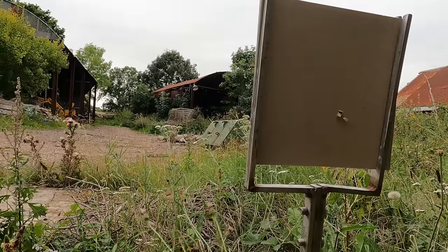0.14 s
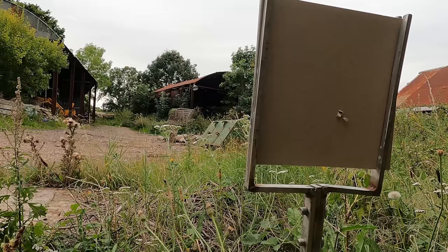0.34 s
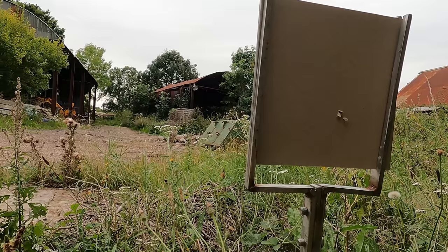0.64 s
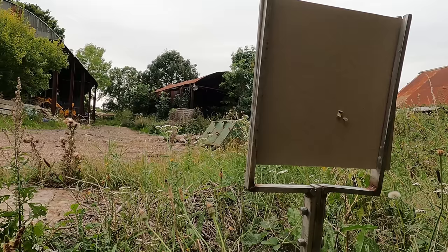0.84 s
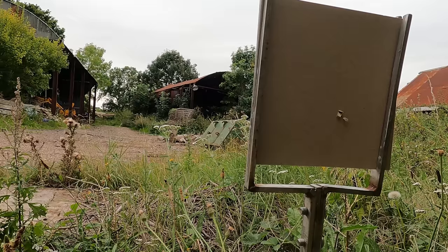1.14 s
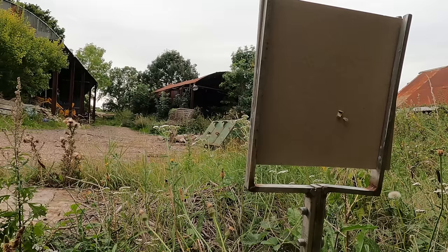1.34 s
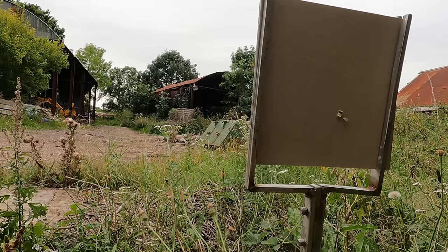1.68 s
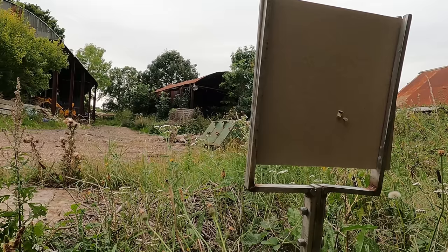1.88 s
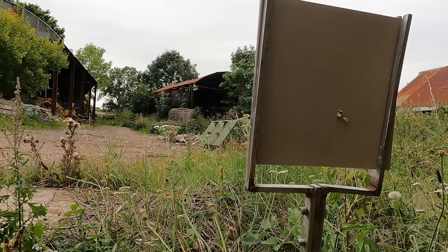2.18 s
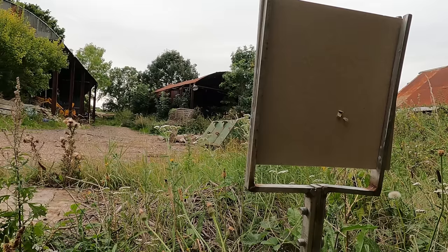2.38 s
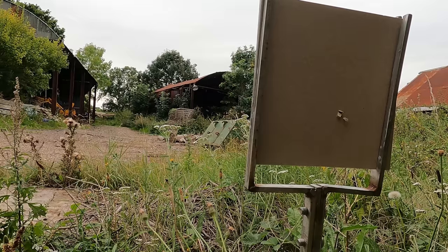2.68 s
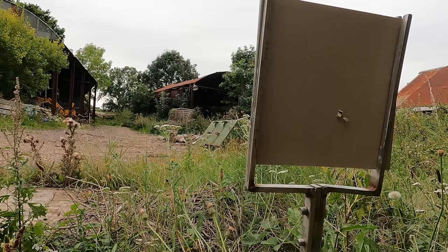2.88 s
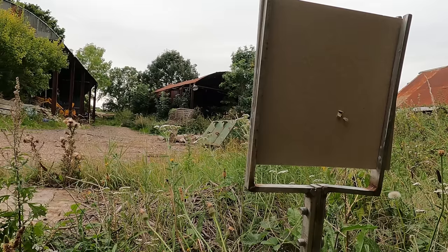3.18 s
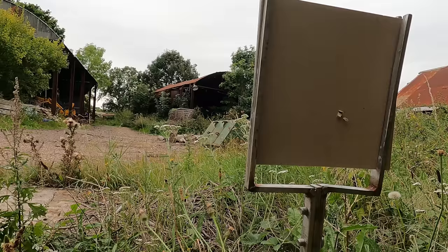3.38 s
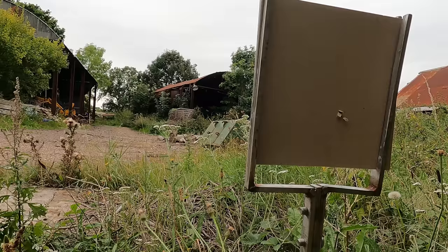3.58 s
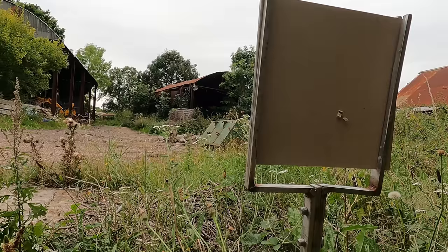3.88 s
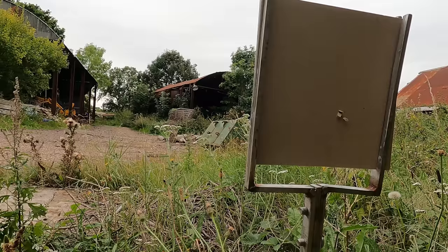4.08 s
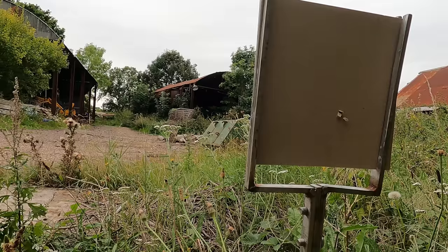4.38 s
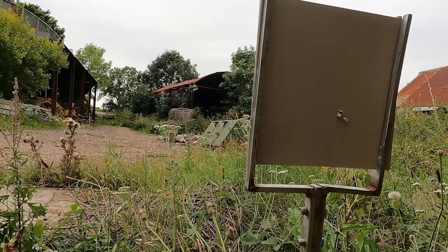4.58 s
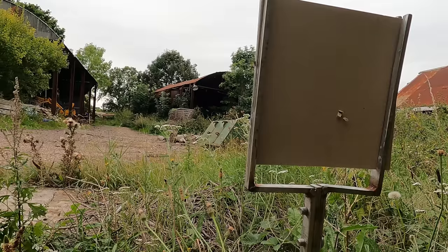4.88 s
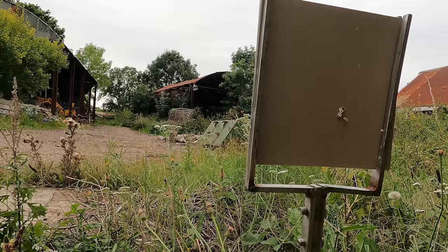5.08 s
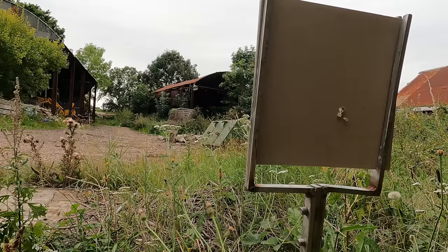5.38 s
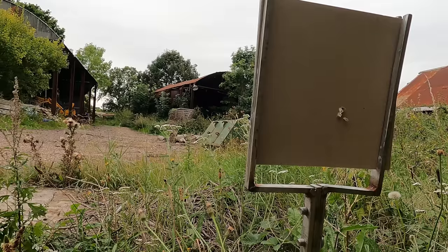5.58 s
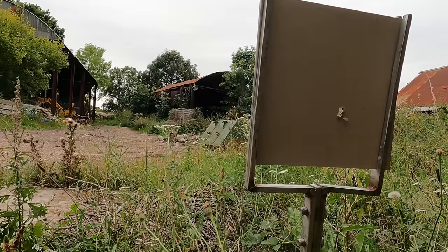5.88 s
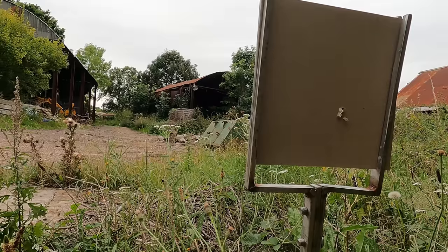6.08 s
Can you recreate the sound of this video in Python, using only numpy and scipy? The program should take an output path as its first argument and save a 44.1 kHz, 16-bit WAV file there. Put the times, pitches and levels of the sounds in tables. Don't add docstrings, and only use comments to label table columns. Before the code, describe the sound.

A vehicle drones past on the left of an open farm, then an air rifle pellet cracks sharply through a card target beside the microphone.

```python
import sys
import numpy as np
from scipy import signal
from scipy.io import wavfile
from scipy.ndimage import uniform_filter1d

SR = 44100
rng = np.random.default_rng(int(sys.argv[2]) if len(sys.argv) > 2 else 0)


def ratio_of_db(decibels):
    return 10 ** (np.asarray(decibels, float) / 20)


def generate_wav(signal):
    frames = np.transpose(np.atleast_2d(signal))
    scaled = np.clip(frames, -1, 1) * 32767
    pcm = np.round(scaled).astype(np.int16)
    wavfile.write(sys.argv[1], SR, pcm)


N = 275184
IMPACT_S = 5.04833


def evened(x):
    return x / np.sqrt(np.mean(x ** 2) + 1e-20)


def read(points, hz):
    f, value = np.transpose(points)
    return np.interp(np.log(hz + 1), np.log(f + 1), value)


def curves(rows, t):
    s, *columns = np.transpose(rows)
    return [np.interp(t, s, c) for c in columns]


def sides(lean_db):
    return ratio_of_db(np.multiply.outer([.5, -.5], lean_db))


def add(mix, s, sound):
    part = mix[:, round(s * SR):][:, :sound.shape[1]]
    part += sound[:, :part.shape[1]]


def burst(hz, db, length_ms):
    t = np.arange(round(length_ms * SR / 1000) + 8) / SR
    return ratio_of_db(db - 60 * (1000 * t / length_ms) ** 2) * np.sin(2 * np.pi * hz * t)


def ring(hz, db, t60):
    t = np.arange(round(1.5 * t60 * SR)) / SR
    soft_start = 1 - np.exp(-t / .0008)
    return ratio_of_db(db - 60 * t / t60) * np.sin(2 * np.pi * hz * t) * soft_start


def blur(hz, width):
    r = np.exp(-np.pi * width / SR)
    slow = rng.standard_normal(len(hz)) + 1j * rng.standard_normal(len(hz))
    for _ in range(2):
        slow = signal.lfilter([1 - r], [1, -r], slow)
    return evened((slow * np.exp(2j * np.pi * np.cumsum(hz) / SR)).real)


def noise(shape, level_db, lean_db, patchy_db, size, tilt_db=0, alike=None):
    # pitch_hz, likeness [0 to 1]
    usual_alike = [(60, 1.0), (150, 1), (380, 0.97367), (950, 0.75), (2380, 0.65), (5980, 0.49),
                   (15000, 0.23)]
    # pitch_hz, share of the lean [ratio]
    lean_share = [(150, 0.05), (380, 0.41), (700, 1.3), (1300, 1.26), (4400, 0.44), (15000, .45)]
    hz, hop, n = np.fft.rfftfreq(size, 1 / SR), size // 4, len(lean_db)
    a, b, c, d, patches = rng.standard_normal((n // hop + 5, len(hz), 5)).T
    patches = uniform_filter1d(patches, size=9, axis=0)
    patches = evened(uniform_filter1d(patches, size=11, axis=1))
    same = np.clip(read(usual_alike if alike is None else alike, hz), -1, 1)[:, None]
    left = a + 1j * b
    right = same * left + np.sqrt(1 - same ** 2) * (c + 1j * d)
    z = np.array([left, right]) * ratio_of_db(read(shape, hz)[:, None] + patchy_db * patches)
    unit = np.sqrt(np.mean(signal.istft(z[0], nperseg=size)[1] ** 2))
    frame = np.minimum(np.arange(z.shape[2]) * hop, n - 1)
    z *= sides(np.outer(read(lean_share, hz), lean_db[frame]))
    if np.ndim(tilt_db):
        z *= ratio_of_db(np.outer(np.log2(hz / 3000 + 0.22), tilt_db[frame]))
    sound = signal.istft(z, nperseg=size, noverlap=size - hop)[1][:, :n]
    return ratio_of_db(level_db) / unit * sound


def torn_card():
    # pitch_hz (sign of first swing), level_db, length_ms, lead_ms, lean_db
    parts = [
        (-1830, .5, 1.75, .06, -4.0),
        (4500, .5, 1.15, .085, 1.0),
        (7400, -14, 1.5, .05, -1.5),
        (880, -12.5, 2.6, -.14, -9.0),
        (3300, -11, 1.1, .11, 12.0),
        (10300, -13, 1.3, .03, 3.0),
        (12500, -20, 1, .04, 5.0),
        (14800, -14, .9, .05, -6.0),
    ]
    out = np.zeros((2, N))
    for hz, db, length_ms, lead_ms, lean_db in parts:
        left, right = np.outer(sides(lean_db), burst(hz, db, length_ms))
        left = np.roll(left, shift=1 + (abs(hz) < 3000))
        add(out, IMPACT_S - lead_ms / 1000, np.array([left, right]))
    return out


def clicks():
    # start_s, peak_db, pitch_hz, length_ms,
    # lean_db
    ticks = [(4.9553, -54, 3803, 3.9356, 0), (4.9648, -46.5, 3700, 4.732, 0.7314),
             (4.9735, -26, 2387, 3.028, 2), (4.9736, -37.5, 5500, 1.505, 4), (4.9757, -30, 7000, 2, 4.5),
             (4.9756, -17, 3709, 2.5, 3), (4.9767, -37, 9500, .8, 2), (4.9884, -15.5, 2248, 3, 4),
             (4.9884, -25, 4700, 2.5022, 3), (4.9886, -28, 7000, 2.5, 3), (4.9892, -42, 12000, 1.5, 0),
             (4.9935, -37.5, 7000, 1.4902, 2.5), (4.9985, -29, 1700, 4.026, 3), (5.002, -27, 2300, 3, 4),
             (5.006, -29, 2600, 3, 2), (5.0126, -30, 3490, 2.5, 0.9032), (5.0245, -30, 2000, 2.5, 0),
             (5.0275, -33, 7000, 2.5, 0), (5.0374, -14, 1700, 1.8, -8), (5.0376, -22, 4600, 1.2, 4),
             (5.0395, -24, 9000, 1.5, 4), (5.0414, -25, 8600, 1.5, 3), (5.0438, -22, 5000, 1.2, -2),
             (5.0445, -21, 8200, 1, 5), (5.0457, -22, 8200, 1, 5), (5.0598, -23, 1507, 5, 10),
             (5.0605, -27, 1080, 9, 8), (5.0599, -30, 4300, 3, -4), (5.0617, -31, 4500, 3, -4),
             (5.074, -39, 2400, 8, 3),
             (5.118, -46, 4106, 3.73, 8.5), (5.134, -45, 5503, 3.033, 3), (5.142, -47.5, 4397, 4, 2),
              (5.218, -47.5, 3600, 2.56, 2), (5.2324, -44, 3198, 3.946, 2), (5.2505, -50, 4997, 3, 1.5),
              (5.261, -36.5, 1950, 4.81, 1.3242), (5.271, -36, 1900, 5.06, 1.7546),
              (5.274, -36.5, 1098, 10.72, 2), (5.277, -37, 1490, 11.85, 1), (5.281, -39, 1894, 7.61, 1.26),
              (5.291, -44, 2399, 6.28, 1), (5.31, -47, 2200, 4.96, 1), (5.417, -64, 5900, 1.9, -1.32),
              (5.4363, -50, 4140, 2.475, 0.5459), (5.545, -62.5, 5058, 2.5, -2.5)]
    out = np.zeros((2, N))
    for s, db, hz, length_ms, lean_db in ticks:
        gritty = min(.3 + .03 * length_ms, 1)
        tone = burst(hz, db, length_ms)[:800]
        n = len(tone)
        tone = tone * (1 - np.exp(-np.arange(n) * hz / (.4 * SR)))
        chance = rng.standard_normal((3, 800))
        band_hz = [hz / 2.2, min(hz * 2.3, 4000 + hz)]
        band = signal.butter(3, band_hz, "band", fs=SR)
        grit = signal.lfilter(*band, .55 * chance[:2] + .83 * chance[2])
        fall = ratio_of_db(db - 60 * (np.arange(n) / n) ** 2)
        add(out, s, ((1 - gritty) * tone + gritty * fall * grit[:, :n]) * sides(lean_db)[:, None])
    return out


def air_pushes():
    # start_s, peak_db, pitch_hz, t60_s (time to fall 60 dB),
    # lean_db
    thumps = [(2.9393, -35.5, 1000, .02, 2.5), (4.974, -30, 400, 0.02949, 1),
              (4.989, -16, 210, 0.02698, 0.5), (4.9885, -25, 450, 0.01728, 1),
              (4.9973, -24, 200, 0.0566, 0), (4.999, -31.5, 380, 0.03883, 3),
              (5.0295, -33, 780, 0.03025, 0), (5.0604, -20.5, 210, .07, 0.5), (5.061, -35, 420, 0.03108, 6),
              (5.0495, -24, 560, .025, -5), (5.015, -36, 520, .05, 0), (5.0385, -27, 900, 0.03996, -4),
              (5.0426, -21, -950, 0.01906, -4)]
    # start_s, peak_db, pitch_hz, t60_s, lean_db
    spring_back = [
        (5.0491, -13, -300, .009, 0),
        (5.0506, -10.5, 105, .022, 0),
    ]
    out = np.zeros((2, N))
    for s, db, hz, t60, lean_db in [*thumps, *spring_back]:
        add(out, s, np.outer(sides(lean_db), ring(hz, db, t60)))
    return out


def stand():
    # pitch_hz, width_hz, level_db, t60_s
    shakes = [
        (110.04, 16, -41.5, .7),
        (205.14, 22, -42, 0.46),
        (407.07, 79, -48.5, 0.92),
        (750, 220, -53.5, 0.48),
        (930, 160, -55, .5),
    ]
    out = np.zeros((2, N))
    t = np.arange(SR // 2) / SR
    for hz, width, db, t60 in shakes:
        shake = ratio_of_db(db - 60 * t / t60) * blur(np.full(len(t), hz), width)
        add(out, IMPACT_S, np.outer(sides(6 * hz / 1000), shake))
    band = signal.butter(2, [8000, 12500], "band", fs=SR)
    spray = signal.lfilter(*band, rng.standard_normal((2, 200)))
    spray = spray - .4 * spray.mean(0)
    spray_db, length_ms = -14, 1.3
    add(out, IMPACT_S - .0001, spray * ratio_of_db(spray_db - 60 * (1000 * t[:200] / length_ms) ** 2))
    return out


def whizz():
    # pitch_hz, level_db per Hz
    rush_colour = [(350, -26), (600, -8), (1100, 0), (2200, -0.5), (3000, -4), (4000, -3.5), (5200, -4.5),
                   (6900, -5.5), (9000, -12), (12000, -19), (13500, -27), (16000, -47)]
    # pitch_hz, likeness [0 to 1]
    wake_alike = [(400, .88), (750, .58), (2500, .62), (3500, 0.64), (7000, 0.92), (12000, .7)]
    # start_s, width_db
    spread = [(4.94, 3.5), (4.99, -1), (5.0, 1), (5.05, 0), (5.08, 4), (5.17, 4), (5.23, -2.5), (5.3, -5.5)]
    # start_s, level_db, brightness_db of the upper half, lean_db
    flight = [
        (4.935, -81, 0.5364, 1.5776),
        (4.972, -58, 0.5, 4),
        (4.976, -35.5, 1, -2.5),
        (4.987, -40, -0.5, 4),
        (4.990, -33, 1.5, 1.2824),
        (5.034, -33, 2.5, 0.9673),
        (5.038, -31, 6, -1.5),
        (5.048, -27, 6.5, -1.84),
        (5.058, -52, 1.5, 1.5),
    ]
    # peak_s, level_db, ms to rise 10 dB, ms to fall 10 dB, brightness_db
    echoes = [
        (5.06, -38.5, 2.5, 11, -8),
        (5.085, -57, 20, 35, 5),
        (5.135, -55.5, 40, 52.5, 3.5),
        (5.225, -52.5, 35, 76.5, -1),
        (5.29, -53.5, 45, 49.5, -5),
        (5.4, -71.5, 80.5, 92, -4.5),
    ]
    t = np.arange(flight[0][0], 5.8, 1 / SR)
    rush = noise(rush_colour, 0, np.zeros(len(t)), patchy_db=1.0, size=256, alike=wake_alike)
    middle = rush.mean(0)
    rush = 1.2 * (middle + (rush - middle) * ratio_of_db(curves(spread, t)[0]))
    crackle = evened(uniform_filter1d(rng.standard_normal(len(t)), size=40))
    rush = rush * ratio_of_db(2 * crackle - 3.5)
    dull = signal.lfilter(*signal.butter(2, 5200, fs=SR), rush)
    bright = rush - dull

    level_db, bright_db, lean_db = curves(flight, t)
    flying = (t < flight[-1][0]) * ratio_of_db(level_db) * sides(lean_db)
    direct = flying * (dull / ratio_of_db(bright_db) + bright * ratio_of_db(bright_db))

    low, high = 0, 0
    for s, db, rise_ms, fall_ms, echo_bright_db in echoes:
        late_ms = 1000 * (t - s)
        level = ratio_of_db(db + 10 * np.minimum(late_ms / rise_ms, -late_ms / fall_ms))
        swell = np.outer(sides(2.5), (t > IMPACT_S) * level)
        low = low + swell / ratio_of_db(echo_bright_db)
        high = high + swell * ratio_of_db(echo_bright_db)
    far_air = signal.butter(2, 7395, fs=SR)
    out = np.zeros((2, N))
    add(out, t[0], direct + signal.lfilter(*far_air, low * dull + high * bright))
    return out


def path():
    # start_s, nearness_db below the closest point (from 5.1 to 5.36 s gain control # lowers it
    # after the shot), screening_db by barns and hedges
    drive = [(.05, -9.5, -4), (.62, -6.5, -6.5), (.85, -5.5, -7), (1.12, -3.5, -5.5),
             (1.38, -0.4772, -1.2923), (1.61, 0, -0.5406), (1.85, -1, -5.5), (1.96, -3, -1.4274),
             (2.08, -4, -2.5), (2.23, -4.5, 0.0292), (2.48, -4.5, -4), (2.66, -5.5, -13), (3.1, -5, -17),
             (3.7, -10.5, -13), (5.1, -11.5, -8.5), (5.36, -19.5, -17), (5.8, -18.5, -20.5),
             (6.24, -19.5, -9)]
    t = np.arange(N) / SR
    closest_s, pass_s = 1.5564, 0.44657
    aim_db = -10 * np.log10(1 + ((t - closest_s) / pass_s) ** 2)
    return (*curves(drive, t), np.maximum(aim_db, -12))


def vehicle_lean(near_db):
    return 9 + 0.5 * near_db


def engine():
    # start_s, pitch_hz, level_db
    firing = [(0, 55.95, -29), (.86, 55.95, -26.5), (1.19, 55.63, -54), (1.3, 54.29, -29.5),
              (1.62, 52.52, -22), (1.84, 51.94, -26), (2.22, 50.14, -32), (2.42, 50.64, -28),
              (2.6, 50.34, -30.5), (2.9, 49.37, -32.5), (3.3, 49.38, -33), (4.0, 48.77, -38.5),
              (4.3, 48.83, -41.5), (4.9, 48.6, -43), (5.75, 47.65, -53), (6.0, 47.08, -43.5),
              (6.24, 47.4, -47)]
    # centre_s, depth_db, half_width_s
    cancels = [
        (2.7, -20, 0.05478),
        (4.11, -13, .06),
    ]
    # pitch_hz at the start, sag with the firing note [power], resting level_db
    drones = [
        (84, 0.95555, -58.5),
        (112.77, 0.98185, -49),
        (150.19, -.55, -54),
        (214.45, .5, -55.5),
        (294.54, .35, -52.5),
    ]
    # peak_s, level_db, seconds to rise or fall 10 dB
    drone_swells = [
        [(1.8, -42, 0.004), (2.35, -40, 0.6162)],
        [(1.78, -31, 0.1824), (4.2, -40, 0.289), (4.8, -46, 0.3115), (6.15, -52, 0.3814)],
        [(.15, -49, .5), (.78, -43.5, 0.0923), (1.33, -34.5, 0.3873), (2.6, -50, .5), (4.3, -49, 0.4394)],
        [(.9, -40.5, 0.1706), (1.5, -34.5, 0.5265), (2.05, -40.5, 0.3637), (2.95, -43.5, 0.1657)],
        [(1.05, -45, 0.1753), (1.8, -49.5, 0.6447)],
    ]
    t = np.arange(N) / SR
    hz, db = curves(firing, t)
    for s, depth_db, half in cancels:
        db = db + depth_db * np.exp(-((t - s) / half) ** 2)
    turns = np.cumsum(hz) / SR - .12
    note = np.outer(sides(0.1295), np.sqrt(2) * ratio_of_db(db) * np.sin(2 * np.pi * turns))
    near_db = path()[0]
    drone_sides = sides(.17 * vehicle_lean(near_db))
    for (start_hz, sag, rest_db), swells in zip(drones, drone_swells):
        level = ratio_of_db(rest_db + 0.49 * near_db)
        for s, top_db, fall in swells:
            level = level + ratio_of_db(top_db - 10 * abs(t - s) / fall)
        note += drone_sides * level * blur(start_hz * (hz / hz[0]) ** sag, width=11.0)
    return note


def traffic():
    # pitch_hz, level_db per Hz
    rumble = [(12, -33.5), (20, -6.5), (43, -6.5), (74, -3), (107, -3.5), (177, -4), (270, -7),
              (300, -15.5), (330, -22.5), (430, -50), (730, -120)]
    # pitch_hz, level_db per Hz
    growl = [(180, -27.5), (300, 0), (414, -9), (554, -11), (692, -19.5), (750, -23), (980, -53),
             (1650, -120)]
    # pitch_hz, level_db per Hz
    tyres = [(410, -40), (700, -14), (911, -6.5), (1070, -3.5), (1150, -7.5), (1360, -10.5), (1760, -14.5),
             (2240, -28.5), (2600, -31), (3380, -62.5), (5720, -120)]
    # pitch_hz, level_db per Hz
    hiss = [(1180, -31), (2000, 1), (2600, -7), (3300, -10), (4600, -11.5), (5600, -16.5), (7500, -22),
            (8600, -32), (10500, -42), (13000, -52.5)]
    # pitch_hz, level_db per Hz
    air = [(1200, -20), (2000, 3), (2800, -6), (3600, -13), (5500, -8), (7500, -9), (8500, -14),
           (9500, -30), (16000, -50)]
    controls = np.array(path())
    lean_db = vehicle_lean(controls[0])
    rumble_db = -25.5 + np.dot((0.7577, 0.0236, 0.4751), controls)
    growl_db = -35 + np.dot((0.3604, 0.2563, 1.2112), controls)
    tyres_db = -43 + np.dot((1.042, 0.034, 0), controls)
    hiss_db = -51.5 + np.dot((1.1288, 1.1797, 0.1189), controls)
    air_db = -73 - 2.5 - 5.5 * (np.arange(N) > 5.2 * SR)
    out = noise(rumble, rumble_db, lean_db, patchy_db=-0.5, size=2048)
    out += noise(growl, growl_db, lean_db, patchy_db=1.2267, size=1024)
    out += noise(tyres, tyres_db, lean_db, patchy_db=1.5, size=512)
    out += noise(hiss, hiss_db + 4.5, lean_db, patchy_db=1.6684, size=512, tilt_db=0.11 * (hiss_db + 56))
    out += noise(air, air_db, .3 * lean_db, patchy_db=0.2217, size=512)
    return out


def band_swells():
    # peak_s, pitch_hz, width_hz, level_db, seconds to rise or fall 10 dB
    noise_bands = [(3.3, 1040, 260, -54, 0.6063), (2.08, 520, 180, -52, 0.3272),
                   (2.52, 2500, 1200, -64.5, 0.2279), (1.95, 4500, 2500, -66, 0.0762),
                   (1.1, 6500, 2500, -75, 0.3816), (2.15, 1800, 600, -57.5, 0.1934),
                   (3.7, 600, 350, -63, 0.4142), (4.47, 2700, 1200, -73, 0.0416), (5.65, 2000, 1200, -75, .3),
                   (5.92, 2600, 1018.6, -82, 0.2274), (6.8, 1800, 800, -73, 0.6715)]
    t = np.arange(N) / SR
    total = np.zeros(N)
    for s, hz, width, db, fall in noise_bands:
        total += ratio_of_db(db - 10 * abs(t - s) / fall) * blur(np.full(N, hz), width)
    return np.outer(sides(5), total)


def birds():
    # start_s, length_s, first pitch_hz, last pitch_hz, level_db
    whistles = [(.001, 0.02155, 6493, 6390, -73.5), (.135, 0.0876, 6200, 5750, -74),
                (0.199, 0.04955, 5745, 5550, -76), (.205, 0.06295, 6190, 6248, -71.5),
                (.262, 0.0254, 6100, 5299, -78), (.15, .12, 5500, 5350, -82), (.3, .05, 6900, 6700, -83),
                (0.161, 0.03914, 4500, 4550, -83.5), (0.198, 0.04585, 3000, 2677, -71.5),
                (.36, 0.02917, 4600, 4482, -76), (.405, 0.03885, 4573, 4457, -71),
                (.445, 0.0264, 4500, 4050, -70.5), (.475, .02, 4000, 4005, -73.5),
                (0.491, 0.02304, 4234, 3987, -72), (.45, 0.02008, 6250, 5947, -81.5),
                (0.466, .05, 5891, 5877, -78), (0.58, .055, 7660, 6807, -87),
                (.622, 0.01975, 5515, 5014, -71), (0.638, .013, 5000, 3880, -71),
                (.649, .011, 3893, 4121, -72.5), (0.659, .012, 3903, 3700, -76.5),
                (1.022, 0.0811, 6200, 5914, -77), (4.425, .014, 5395, 5100, -79.5),
                (4.494, 0.007982, 2895, 3905, -76), (4.499, 0.01314, 3970, 2900, -71.5),
                (4.506, 0.02258, 2900, 2860, -71.5), (4.527, 0.023886, 5650, 4150, -72.5),
                (4.546, 0.0131, 4194, 3850, -78)]
    haze_db, haze_width_hz, haze_extra_s = -3, 1600, .04
    out = np.zeros((2, N))
    for s, length, first_hz, last_hz, db in whistles:
        hz = np.linspace(first_hz, last_hz, round(length * SR))
        glide = abs(last_hz - first_hz) / (1000 * length)
        clear = min(.45 + .005 * glide, 1)
        pure = np.sqrt(2) * np.sin(2 * np.pi * np.cumsum(hz) / SR)
        whistle = clear * pure + (1 - clear) * blur(hz, width=320)
        add(out, s, (ratio_of_db(db + 2.5) * whistle * signal.windows.tukey(len(hz), .4))[None])
        haze_hz = np.full(round((length + haze_extra_s) * SR), hz.mean())
        haze = np.array([blur(haze_hz, haze_width_hz) for _ in range(2)])
        add(out, s, ratio_of_db(db + haze_db) * haze * np.hanning(len(haze_hz)))
    return out


def cricket():
    # start_s, level_db, length_s
    rasps = [
        (1.769, -71.5, 0.02),
        (1.79, -69.5, .03),
        (1.816, -68, .036),
        (1.849, -81, .025),
        (2.35, -89.5, .025),
    ]
    out = np.zeros((2, N))
    for s, db, length in rasps:
        hz = np.full(round(length * SR), 11740)
        rasp = np.array([blur(hz, width=2200) for _ in range(2)])
        add(out, s, ratio_of_db(db) * rasp * signal.windows.tukey(len(hz), .3))
    return out


def scene():
    shot = torn_card() + clicks() + air_pushes() + stand() + whizz()
    vehicle = engine() + traffic() + band_swells()
    return shot + vehicle + birds() + cricket()


def band_limit(x):
    return signal.sosfilt(signal.butter(12, 16260, fs=SR, output="sos"), x)


def record(dry):
    b, a = signal.butter(8, 15700, fs=SR)
    settled = np.outer(dry[:, 0], signal.lfilter_zi(b, a))
    smooth = signal.lfilter(b, a, np.clip(dry, -.92, .92), zi=settled)[0]
    return band_limit(smooth)


dry = scene()
out = record(dry)
generate_wav(out)
```